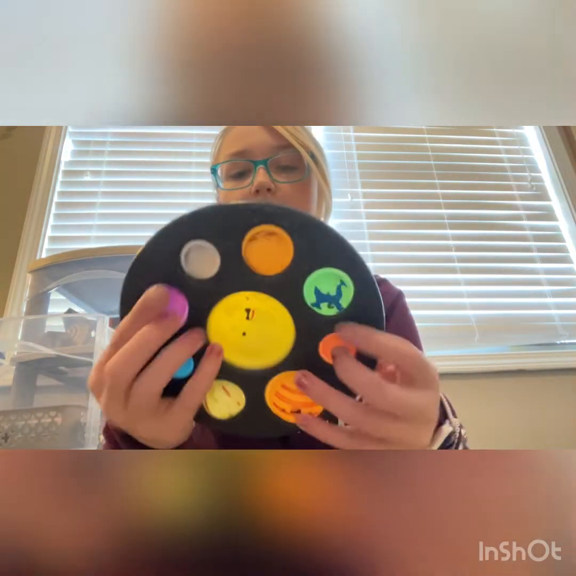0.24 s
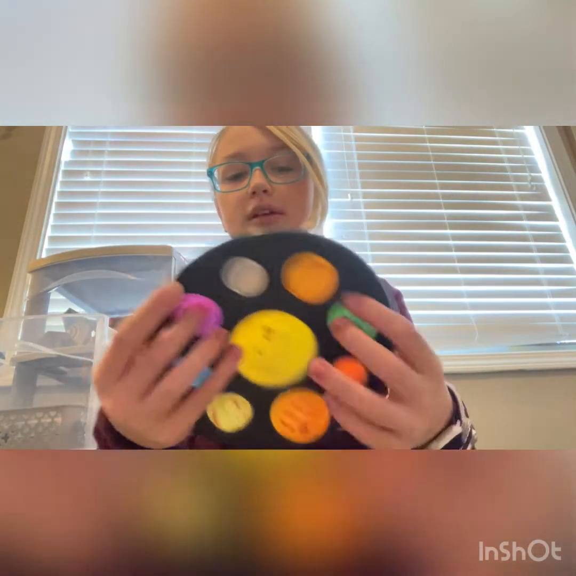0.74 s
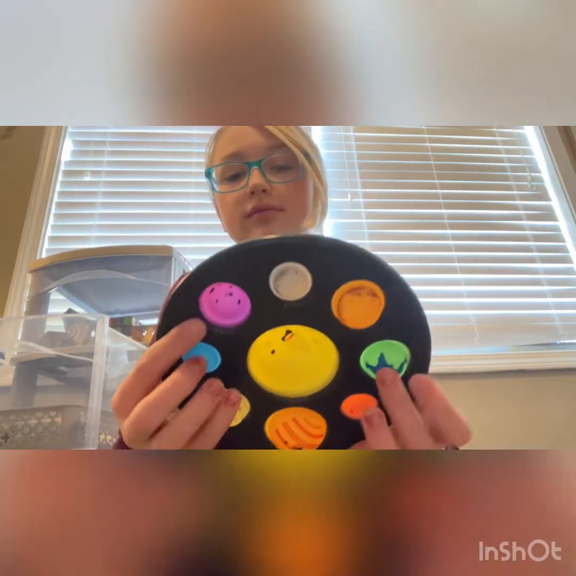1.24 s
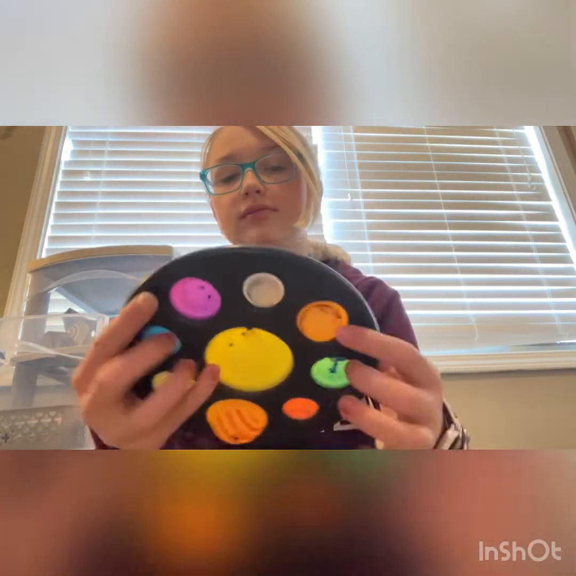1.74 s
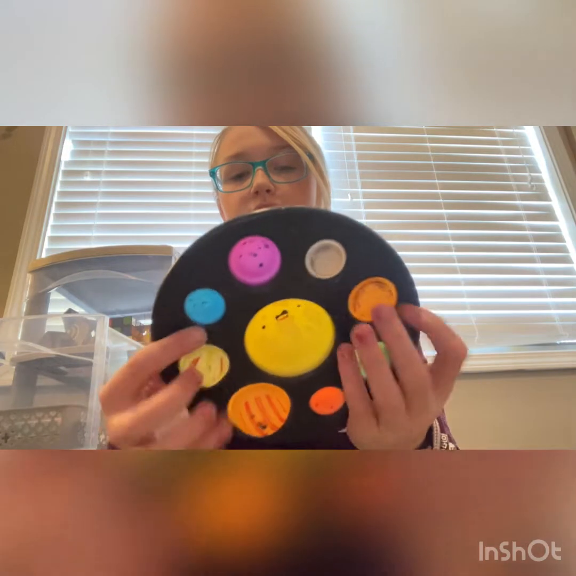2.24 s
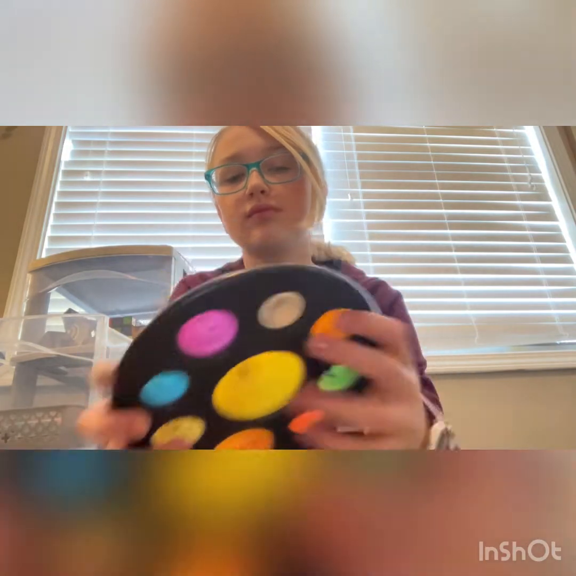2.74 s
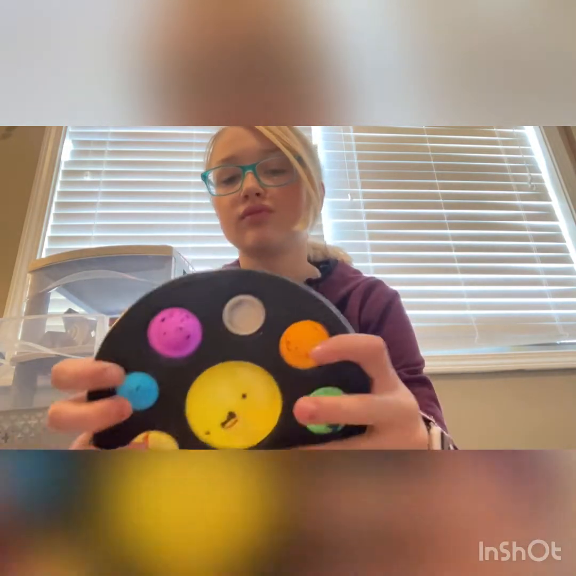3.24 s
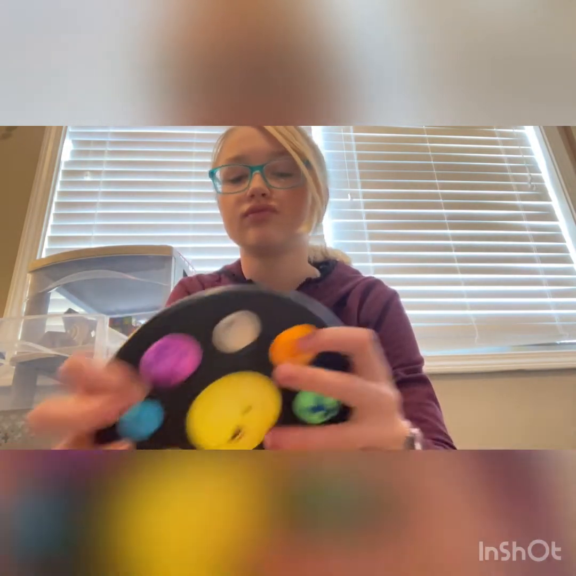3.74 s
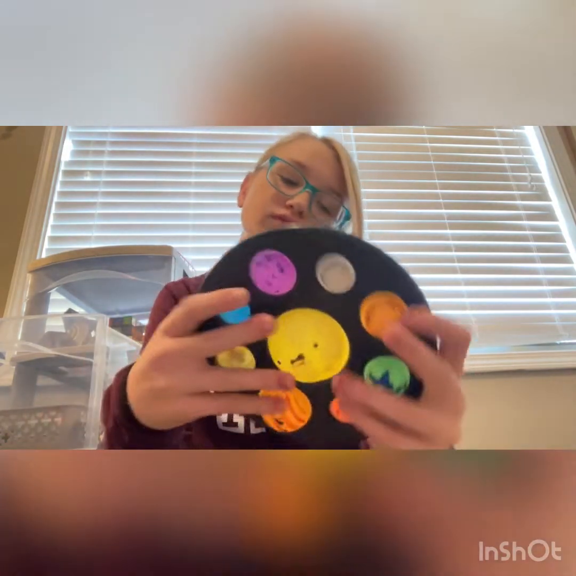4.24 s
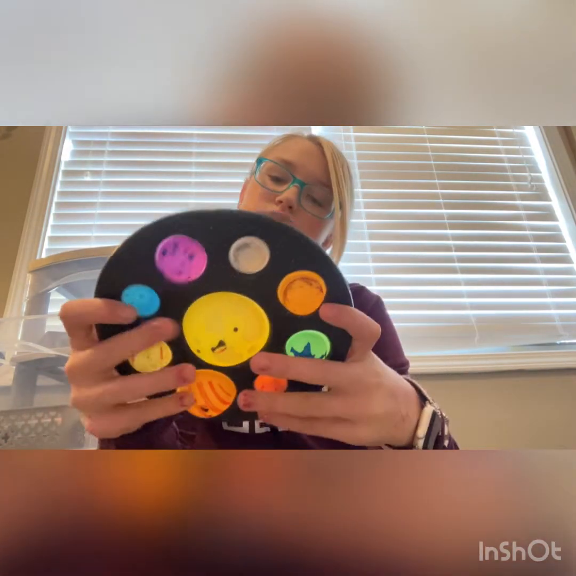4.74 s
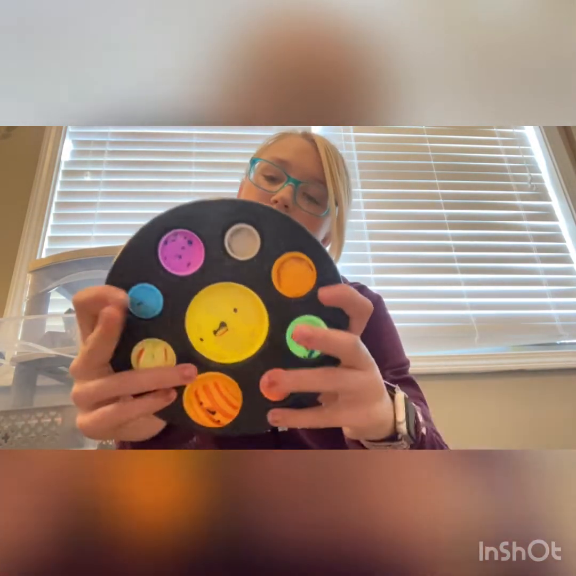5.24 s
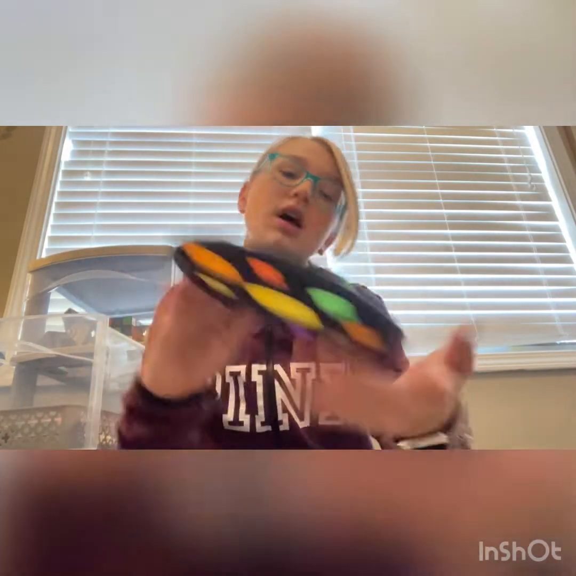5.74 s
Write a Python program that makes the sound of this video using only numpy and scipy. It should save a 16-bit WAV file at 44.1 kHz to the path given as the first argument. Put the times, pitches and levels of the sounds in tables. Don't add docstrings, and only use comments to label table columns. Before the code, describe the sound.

A handheld pop toy is pressed very close to the microphone. Each dimple snaps over with a rough, woody-rubbery click and a bright crack, jolting the plate with a short thud. Early pops are spaced apart among small taps and half-dents; later ones crowd together with louder rubbing. The room adds a brief, faint tail above a quiet hum.

```python
import sys
import numpy as np
from scipy import signal
from scipy.fft import rfft, irfft
from scipy.io import wavfile
from scipy.ndimage import uniform_filter1d

SR = 44100
rng = np.random.default_rng(int(sys.argv[2]) if len(sys.argv) > 2 else 0)


def how_loud(loudness_db):
    steps = np.asarray(loudness_db, float) / 20
    return 10 ** steps


def output_pcm(signal):
    pcm = np.clip(np.atleast_2d(signal).T, -1, 1) * 32767
    wavfile.write(sys.argv[1], SR, np.round(pcm).astype(np.int16))


N = 263318

# f/Hz, correlation
ROOM_LIKENESS = [(130, 0.95), (300, 0.22), (650, 0.47), (1400, 0.11), (3000, 0.11), (5000, 0.097),
                 (6200, 0.28), (15000, 0.1)]


def evened(x):
    return x / np.sqrt(np.mean(x ** 2) + 1e-20)


def peaked(x):
    return x / np.sqrt(2 * uniform_filter1d(x ** 2, size=66).max() + 1e-20)


def wavering(shape, size):
    return evened(uniform_filter1d(rng.standard_normal(shape), size=size))


def read(points, hz):
    f, value = np.transpose(points)
    return np.interp(np.log(hz + 1), np.log(f + 1), value)


def add(mix, start_s, sound):
    part = mix[round(start_s * SR):][:len(sound)]
    part += sound[:len(part)]


def high(x, hz, order):
    return signal.lfilter(*signal.butter(order, hz, "high", fs=SR), x)


def ring(x, modes, detune=1):
    t = np.arange(600) / SR
    body = 0
    for hz, width_hz, db in modes:
        body = body + how_loud(db) * np.exp(-np.pi * width_hz * t) * np.sin(2 * np.pi * hz * detune * t)
    return np.convolve(x, body)[:len(x)]


def noise(colour_db, size, count=N):
    hop = size // 4
    frames, hz = count // hop + 5, np.fft.rfftfreq(size, 1 / SR)[:, None]
    a, b, c, d = rng.standard_normal((frames, len(hz), 4)).T
    alike = np.clip(read(ROOM_LIKENESS, hz), -1, 1)
    left, other = a + 1j * b, c + 1j * d
    z = np.array([left, alike * left + np.sqrt(1 - alike ** 2) * other])
    z = z * how_loud(colour_db(hz, np.arange(frames) * hop / SR))
    return evened(signal.istft(z, nperseg=size, noverlap=size - hop)[1][:, :count])


def air():
    # f/Hz, density/dB
    air_colour = [(30, -3), (86, -7), (184, -16), (600, -32.5), (866, -26.5), (960, -44.5), (5590, -48),
                  (9220, -44)]
    # f/Hz, level/dB rms
    hum_partials = [
        (120, -71),
        (55, -78.5),
        (160, -86.5),
        (267, -86.5),
    ]
    t = np.arange(N) / SR
    hum = np.zeros(N)
    for waver, (hz, db) in zip(2.2 * wavering((len(hum_partials), N), 1500), hum_partials):
        hum += how_loud(waver + db) * np.sqrt(2) * np.sin(2 * np.pi * hz * t)
    level_db = -69.5 + 5.3 * wavering(N, 4000)
    return how_loud(level_db) * noise(lambda hz, s: read(air_colour, hz), size=2048) + hum


def strokes():
    # start t/s, length/s, level/dB, fizz over it/dB
    slides = [(-.06, 0.32, -63, -24), (0.513, 0.38, -63, -11), (0.775, 0.2, -67.5, 2.5),
              (0.893, 0.18, -66, -32), (1.233, 0.14, -51.5, -10), (1.458, 0.37, -61.5, -5.5),
              (1.949, 0.15, -72.5, -9), (2.153, 0.12, -72.5, -6.5), (2.43, 0.4, -62, -6.5),
              (2.79, 0.41, -57, -14), (3.128, 0.29, -53.5, -17), (3.466, 0.18, -46.5, -13),
              (3.735, 0.32, -53, -13), (4.159, 0.33, -54, -15), (4.532, 0.25, -77.5, -12),
              (4.888, 0.079, -78, -25), (5.05, 0.21, -49.5, -28.5), (5.09, 0.025, -61.5, -22.5),
              (5.442, 0.36, -56.5, -14), (5.638, 0.33, -53, -16)]
    rise_s, fall_s, resting_db = 0.057, 0.19, -84
    t, out = np.arange(N) / SR, np.full((2, N), how_loud(resting_db))
    for start_s, length_s, db, fizz_db in slides:
        rise, fall = (t - start_s) / rise_s, (start_s + length_s - t) / fall_s + .5
        shape = np.clip(np.minimum(rise, fall), 0, 1) ** 2
        out += shape * how_loud(np.array([[db], [db + fizz_db]]))
    return out


def rub():
    # f/Hz, level/dB
    rub_colour = [(120, -20.5), (300, -6.5), (620, -15.5), (1400, -4.5), (2000, -10.5), (2700, -11.5),
                  (5000, -19.5), (6200, -39)]
    clump_db, catches_per_s = 4.5, 130
    body_gain, fizz_gain = how_loud(-3.5) * strokes()
    clumps_db = clump_db * wavering((2, N), 350)
    catches = how_loud(1.0 * rng.exponential(1, N)) * (rng.random(N) < catches_per_s / SR)
    grip = how_loud(clumps_db[0]) * (1 + .9 * np.convolve(catches, np.hanning(130), "same"))
    plate_gain = how_loud(read(rub_colour, np.fft.rfftfreq(N, 1 / SR)))
    body = irfft(rfft(rng.standard_normal(N) * grip) * plate_gain, N)
    fizz = signal.lfilter([1], [1, -.4], high(rng.standard_normal(N), 5600, order=4))
    fizz = fizz * np.sqrt(grip) * how_loud(.7 * clumps_db[1])
    return body_gain * evened(body) + fizz_gain * evened(fizz)


def pop(db, cup_hz, rim_db, crack_db, flip_ms, grit_db, knock_db, chance):
    # f/Hz, width/Hz, level/dB
    cup_modes = [
        (1180, 110, -30),
        (1500, 270, -13.5),
    ]
    # f/Hz, width/Hz, level/dB
    rim_modes = [
        (2620, 540, 17.5),
        (3470, 63, -0.5),
        (4040, 150, -1.5),
        (4990, 37, -11),
    ]
    # f/Hz, width/Hz, level/dB
    knock_modes = [
        (378, 6.2, -8),
        (231, 67, -1.5),
    ]
    cup_width_hz = 300
    first_give = 3.8
    far_cup_db, far_rim_db, far_widening = -3, -0.5, 5.5

    t_ms = np.arange(chance.shape[1]) / SR * 1000 - 8
    flip_ms = np.clip(flip_ms, .8, 9.6)
    since, after = np.maximum(t_ms, 0), np.maximum(t_ms - flip_ms, 0)
    push = np.exp(np.minimum(t_ms - .5, 0) / .8 - after / .5 - .5 * since / flip_ms)
    creak = how_loud(-19) * np.exp(np.minimum(t_ms, 0) / 2.6) * (t_ms < flip_ms)
    settle = how_loud(-17) * np.exp(-after / 5) * (t_ms > 0)
    slips = (push + creak + settle) * chance[0] * (0.039 + (abs(chance[1]) > 1.5))
    slips[370] += first_give * how_loud(grit_db)
    soft = np.convolve(slips, np.hanning(9), "same")
    gritty = slips + 0.6 * push * chance[1]
    fizz = (push * np.exp(-since / 4.2) + 1.2 * settle) * chance[2] * (0.21 + abs(chance[0]))

    def cup(v, widening):
        modes = [(cup_hz, cup_width_hz * widening, 0)]
        modes += [(hz, width_hz * widening, mode_db) for hz, width_hz, mode_db in cup_modes]
        return high(ring(v, modes), 0.8 * cup_hz / widening ** .15, order=3)

    def rim(v, widening):
        return high(ring(v, rim_modes, 1 + 0.08 * chance[2, 0]), 2100, order=2)

    def crack(v, widening):
        return signal.lfilter([1], [1, -.68], high(v, 4800, order=4))

    def knock(v, widening):
        return ring(v, knock_modes, 1 + 0.11 * chance[2, 1])

    blow = 1. * (np.arange(len(t_ms)) == 400)
    near, far = np.zeros((2, len(t_ms)))
    for part_db, near_db, far_db, drive, body in [
            (0, grit_db, far_cup_db, soft, cup),
            (rim_db, grit_db, far_rim_db, gritty, rim),
            (crack_db, 0, 0, fizz, crack),
            (-17.5 + knock_db, 0, 0, slips, knock)]:
        part = how_loud(db + part_db) * peaked(body(drive, 1.0))
        near += how_loud(near_db) * part
        far += how_loud(far_db) * evened(body(blow, far_widening)) * np.std(part)
    return near, far


def dimples():
    # t/s, cup level/dB, cup f/Hz
    touches = [(.0246, -48, 1280), (.0546, -46, 1690), (.2383, -38.5, 1580), (.5506, -46, 1310),
               (.584, -38, 1270), (.661, -45, 1300), (.741, -36.5, 1330), (.77, -35, 1310),
               (1.0307, -44, 1384), (1.6572, -39, 1500), (1.677, -47, 1400), (2.307, -44, 1040),
               (2.457, -41, 700), (2.5071, -35.5, 930), (2.5618, -50, 1140), (3.9255, -39, 1350),
               (4.2284, -42.5, 1400), (4.2319, -34.5, 1400), (4.2847, -37.5, 1040), (4.2954, -42, 1090),
               (4.3208, -32.5, 1500), (4.5529, -47, 1430), (4.7085, -44, 1440), (4.9378, -56, 1430),
               (5.5483, -51, 1120), (5.5675, -38, 1860), (5.5731, -35.5, 1340), (5.5798, -36.5, 1810),
               (5.6283, -54, 1490), (5.9105, -42.5, 1060)]
    # t/s, cup level/dB, cup f/Hz, crack over cup/dB
    dents = [(0.0862, -34, 1060, -57), (0.1206, -34, 1120, -21.5), (0.1293, -25.5, 1180, -14),
             (0.591, -32, 1280, -14.5), (0.6952, -32.5, 1290, -20), (0.703, -26.5, 1260, -10.5),
             (0.985, -31, 1270, -18.5), (1.1946, -29, 1074, -17), (0.6005, -51, 1500, 0),
             (1.648, -35.5, 1580, -14), (1.7091, -30.5, 1460, -14), (1.742, -23, 1410, -21.5),
             (1.741, -22.5, 2530, -56), (0.9073, -42, 1500, 0.5), (1.7768, -32, 1410, -7),
             (1.8511, -31, 1380, -59), (1.86, -32.5, 1250, -37.5), (1.8885, -27.5, 1380, -25.5),
             (2.271, -37.5, 1085, -70), (0.8971, -38, 1740, -10), (2.525, -34, 1720, -7),
             (2.642, -34.5, 1628, -23), (3.3172, -33, 1180, -12.5), (3.4998, -30, 1010, -15.5),
             (3.848, -32, 1620, -10), (4.4335, -30, 1045, -22.5), (5.4929, -45.5, 2700, -13),
             (5.616, -36.5, 1200, -12.5), (5.6575, -28, 1240, -26), (5.6716, -31.5, 1610, -11)]
    # t/s, level/dB
    creaks = [(0.228, -58), (0.644, -60), (0.9168, -46), (0.9596, -44.5), (1.048, -53.5), (1.269, -62.5),
              (1.2827, -52), (1.9988, -57.5), (2.0539, -62), (2.174, -62), (2.1936, -63), (2.206, -63.5),
              (2.9989, -41), (3.413, -62.5), (3.434, -56), (3.462, -52), (4.158, -49), (4.588, -64),
              (4.599, -48), (4.7187, -51), (5.4958, -45.5)]
    # t/s, cup level/dB, cup f/Hz
    peels = [(.3044, -35.5, 1480), (.7196, -29.5, 1090), (.7858, -33.5, 1330), (.8196, -45, 1074),
             (.9335, -43, 1590), (1.7598, -35, 1500), (.9394, -36, 1420), (1.0563, -41, 1440),
             (1.2074, -40.5, 1000), (1.2909, -41, 1110), (1.5065, -41, 1850), (1.5469, -45.5, 1300),
             (1.5945, -48, 1176), (1.7176, -36, 1400), (2.0306, -55.5, 1453), (2.4801, -43.5, 1278),
             (2.8083, -46, 1850), (3.0162, -41.5, 1180), (3.2057, -38.5, 2010), (3.289, -36.5, 1460),
             (3.3604, -39.5, 1830), (3.5119, -54, 1380), (3.7946, -60, 1460), (3.8354, -56, 4000),
             (3.9425, -42.5, 1270), (4.1957, -47, 1383), (5.0589, -45.5, 1594), (5.4626, -44, 1273),
             (5.609, -44, 1140), (5.5287, -46.5, 4640)]
    # t/s, cup level/dB, cup f/Hz, crack over cup/dB, flip length/ms
    flips = [(0.3561, -13.5, 1440, -25.5, 6.9), (.413, -19.5, 845, -50.5, 9.8),
             (0.434, -7.5, 780, -18.5, 3.7), (1.3203, -7.5, 1395, -29, 3.7),
             (1.3299, -13, 1206, -17.5, 2.8), (1.3489, -19.5, 1300, -13.5, 3.3),
             (2.3332, -11, 1107, -40.5, 4.8), (2.3455, -9.5, 1306, -15, 0.79), (2.349, -4, 921, -14, 3.3),
             (2.3564, -19.5, 981, -26.5, 3.0), (2.8711, -3, 1198, -14, 2.7), (2.9042, -2.5, 1290, -13, 6.8),
             (3.1003, -14, 1930, -18, 4.1), (3.1275, -7.5, 1353, -8.5, 4.2), (3.558, -3.5, 1047, -13, 1.7),
             (3.562, -8.5, 1400, -25.5, 3.6), (3.573, -24.5, 1567, -34.5, 1.6),
             (3.873, -17.5, 1677, -6, 3.3), (3.9618, -10, 1310, -9.5, 4.6), (4.3342, -14, 770, -17, 17),
             (4.3453, -6, 1500, -15, 7.2), (5.1207, -4, 1680, -11.5, 6.6), (5.7448, -17.5, 1500, -4, 4.6),
             (5.7539, -14.5, 1600, -17.5, 7.3)]
    touch_ms, tick_ms, dent_ms, creak_hz = 4.8, 2.6, 3.2, 1400
    grit_db, grit_knock_db = -10.5, -1
    presses = [(*row, grit_db, grit_knock_db) for row in flips] + [(*row, dent_ms, 0, 0) for row in dents]
    rows = []
    for s, db, hz, crack_db, *more in presses:
        rim_db = 1.5 + 0.68 * crack_db
        rows.append((s, db, hz, rim_db, crack_db, *more))
    creaking = [(*row, creak_hz) for row in creaks]
    for ticks, rim_db, ms in [(touches, -18, touch_ms), (peels, -8.5, tick_ms), (creaking, -2.5, tick_ms)]:
        rows += [(s, db, hz, rim_db, rim_db - 12, ms, 0, 0) for s, db, hz in ticks]
    out = np.zeros((2, N))
    for (s, *settings), chance in zip(rows, rng.standard_normal((len(rows), 3, 1700))):
        for mix, sound in zip(out, pop(*settings, chance)):
            add(mix, s - .0086, sound)
    return out


def plate():
    # t/s, level/dB, f/Hz, t60/s
    swings = [(.13, -51.5, 457, 0.018), (1.194, -52, 381, 0.016), (.59, -49, 285, 0.026),
              (.241, -56.5, 377, 0.041), (2.334, -22, 343, 0.012), (5.121, -29, 381, 0.05),
              (.361, -37.5, 161.4, 0.2), (.424, -40.5, 111, 0.091), (.594, -42, 100, 0.033),
              (.724, -33.5, 115, 0.018), (.91, -45, 102, 0.045), (.945, -28.5, 67.1, 0.028),
              (1.328, -33, 103, 0.049), (1.72, -25, 74, 0.023), (2.002, -37, 71.6, 0.033),
              (2.043, -45.5, 73.4, 0.05), (2.49, -50.5, 69, 0.06), (2.645, -49.5, 120, 0.049),
              (2.351, -18.5, 104, 0.023), (2.589, -40, 80.3, 0.064), (2.877, -33.5, 163.5, 0.12),
              (3.131, -29, 127, 0.032), (3.503, -35, 92.7, 0.038), (3.56, -27.5, 108.4, 0.046),
              (3.5605, -30.5, 335.4, 0.027), (3.88, -27, 80.7, 0.027), (3.963, -23, 142, 0.027),
              (4.232, -39, 127.2, 0.022), (4.342, -33, 111, 0.071), (4.558, -54, 68.4, 0.09),
              (.092, -43, 60, 0.038), (.366, -35, 70, 0.049), (.742, -45, 60, 0.04),
              (1.345, -24.5, 65, 0.024), (1.873, -42.5, 59.3, 0.033), (4.36, -34, 52, 0.072),
              (5.125, -19, 78, 0.027), (5.755, -22.5, 74, 0.023)]
    # t/s, level/dB, f/Hz
    flexes = [(.414, -35.5, 310), (.434, -15.5, 367), (1.329, -28, 190), (1.354, -24, 207),
              (1.675, -42.5, 252), (2.345, -16.5, 226), (2.352, -18, 414), (2.906, -12.5, 162),
              (2.904, -14.5, 219), (3.101, -22, 364), (3.129, -12, 277), (3.318, -41.5, 247),
              (3.501, -26.5, 325), (3.558, -8.5, 338), (3.849, -33.5, 290), (3.962, -14.5, 266),
              (4.336, -22, 253), (4.346, -14, 312), (5.619, -46.5, 326), (5.747, -28.5, 220)]
    flex_cycles = 3.43
    out, t = np.zeros(N), np.arange(9000) / SR
    for s, db, hz, t60_s in [*swings, *[(s, db, hz, flex_cycles / hz) for s, db, hz in flexes]]:
        turns = hz * (t + 0.0008 * (1 - np.exp(-t / 0.0056)))
        swell = 1 - np.exp(-(t * hz / 0.5) ** 2)
        decay = how_loud(db + 3.0 - 60 * t / max(t60_s, .01))
        add(out, s - 0.099 / hz, decay * swell * np.sin(2 * np.pi * turns))
    return out


def gives():
    # t/s, level/dB, f/Hz, swell/ms
    flip_gives = [(0.3571, -19, 1450, 0.92), (0.3624, -32, 1400, 1.3), (0.4138, -17.5, 684, 0.22),
                  (0.4393, -19.5, 1025, 0.56), (1.3212, -16.5, 1440, 0.85), (1.3289, -14, 1370, 0.32),
                  (1.3332, -16, 1330, 0.27), (1.3344, -38.5, 1560, 1), (1.3493, -23.5, 1260, 0.95),
                  (1.3536, -24, 1670, 0.51), (1.3592, -28.5, 1590, 0.95), (2.3345, -15.5, 984, 0.72),
                  (2.3449, -8.5, 1430, 0.67), (2.3502, -9.5, 720, 0.69), (2.3575, -8.5, 680, 0.47),
                  (2.365, -16.5, 1140, 0.6), (2.8714, -14, 895, 1), (2.8719, -10.5, 1470, 0.94),
                  (2.9035, -5, 1240, 0.67), (3.1026, -24.5, 1700, 1.1), (3.1278, -5, 1340, 0.53),
                  (3.5574, -4, 1404, 0.25), (3.5577, -7, 1040, 0.57), (3.5606, -16, 1615, 2.01),
                  (3.5631, -26, 1540, 0.83), (3.5737, -27, 1725, 1.3), (3.8734, -23, 1880, 0.34),
                  (3.8767, -18.5, 1540, 0.24), (3.9607, -15, 1218, 1.4), (3.9674, -25, 1880, 0.86),
                  (4.3374, -19, 1460, 0.3), (4.3392, -29.5, 1120, 0.64), (4.3443, -11.5, 1687, 1.1),
                  (4.3453, -18.5, 744, 0.7), (4.3487, -18, 1437, 1.9), (4.3524, -14, 1139, 0.62),
                  (4.3547, -24, 1930, 0.9), (5.1201, -11.5, 1830, 1.06), (5.1227, -4.5, 1410, 1.1),
                  (5.7457, -18, 1443, 0.52), (5.7483, -21.5, 1470, 0.78), (5.7528, -17, 1430, 0.25),
                  (5.7575, -32, 1160, 1.5),
                  (0.3567, -37.5, 2940, 0.67), (0.4328, -20, 5180, 0.27), (0.4334, -19, 3670, 0.35),
                 (0.4342, -22.5, 2620, 0.6), (0.4385, -26.5, 4360, 0.68), (0.4398, -22, 2580, 0.5),
                 (1.3295, -20.5, 4650, 0.37), (1.3296, -14.5, 2930, 0.79), (2.3437, -25, 3780, 1.06),
                 (2.3448, -14.5, 2574, 0.52), (2.3491, -17.5, 5120, 0.58), (2.3495, -12.5, 3790, 0.34),
                 (2.35, -17.5, 2460, 1.1), (2.3613, -30.5, 2600, 1.8), (2.3658, -27.5, 2490, 0.89),
                 (2.8717, -11, 4070, 0.58), (2.8724, -13, 2500, 0.82), (2.9028, -15.5, 4440, 0.41),
                 (2.9032, -15.9, 2800, 0.83), (2.9033, -25, 3620, 1.9), (2.9057, -28.5, 4090, 1),
                 (2.906, -17, 2087, 0.74), (3.1009, -27, 2750, 0.99), (3.1278, -26.5, 3390, 1.1),
                 (3.1288, -24.5, 4350, 0.75), (3.1297, -9.5, 1980, 0.39), (3.1311, -17, 2630, 0.94),
                 (3.5573, -20, 5420, 1.01), (3.5578, -20, 2880, 0.79), (3.5579, -9.5, 4100, 0.49),
                 (3.5594, -20, 2800, 0.93), (3.5631, -23.5, 3875.0, 0.56), (3.8728, -35.5, 5100, 0.95),
                 (3.9608, -28, 4443, 1.4), (3.9618, -22.5, 5900, 0.46), (3.962, -33, 3474, 0.94),
                 (3.9624, -19.5, 2395, 0.82), (3.9635, -24.5, 4050, 0.5), (4.3466, -12.5, 2645, 0.54),
                 (4.3494, -23.5, 3030, 0.83), (5.1203, -14.5, 3610, 0.49), (5.1229, -14.5, 4140, 1.26),
                 (5.1247, -9, 2594, 0.76), (5.7449, -19.5, 2720, 0.63), (5.7449, -26.5, 4840, 0.87),
                 (5.7592, -26, 2680, 1.1),
                  (3.55, -31.5, 1300, 1.8), (.416, -26.5, 1500, 0.85), (0.4339, -8.5, 757, 0.62),
             (0.4358, -10.5, 904, 0.27), (2.333, -20.5, 1500, 0.66), (2.358, -17.5, 1300, 0.88),
             (2.878, -24, 1500, 0.91), (2.897, -22, 1590, 2.2), (2.902, -25, 987, 0.77),
             (2.905, -12, 1217, 0.74), (3.131, -20.5, 1100, 0.91), (3.5785, -25.5, 1110, 0.86),
             (4.372, -31.5, 1336, 0.82), (5.116, -26.5, 1500, 1.16), (5.1207, -11, 2298, 1.2),
             (5.126, -4, 1550, 0.81), (5.1268, -20.5, 3700, 1.0), (5.129, -17, 2800, 0.72)]
    out, t = np.zeros(N), np.arange(900) / SR
    for s, db, hz, swell_ms in flip_gives:
        u = t / (np.clip(swell_ms, .2, 3) / 1000)
        tone = np.sin(2 * np.pi * hz * t * (1.01 - 0.0043 * u))
        add(out, s, how_loud(db + 2.0) * u * np.exp(1 - u) * tone)
    return out


def echoes(x):
    # delay t/s, level/dB
    walls = [
        (0.015, -20),
        (0.022, -24.5),
        (.029, -30),
    ]
    out = np.zeros(N)
    for s, db in walls:
        add(out, s, how_loud(db) * x)
    return out


def room(x):
    # f/Hz, t60/s
    room_t60 = [(100, 0.57), (300, 0.028), (700, 0.25), (1500, 0.3), (3000, 0.26), (6000, 0.21),
                (14000, 0.24)]
    # f/Hz, level/dB
    room_colour = [(100, -1), (400, 2.5), (1500, 1), (4000, -0.5), (8000, 6), (15000, 4)]
    out, turn = np.zeros((2, N)), np.arange(N) / SR * 1.5
    t = np.arange(SR // 2) / SR

    def dying_db(hz, s):
        return read(room_colour, hz) - 60 * np.minimum(s, 1) / read(room_t60, hz)

    for k in range(3):
        tail = noise(dying_db, size=256, count=len(t))[:, :len(t)]
        lumps = how_loud(3.0 * wavering(len(t), 90))
        tail = tail * np.clip((t - .006) / 0.0005, 0, 1) * lumps
        share = np.sqrt(2 / 3) * abs(np.cos(np.pi * (turn + k / 3)))
        out += signal.fftconvolve((x * share)[None], tail / np.linalg.norm(tail[0]), axes=1)[:, :N]
    return out


def ports(pair, wander):
    # f/Hz, phase/rad
    port_lead = [(0, 0), (1700, -.1), (2600, -1.6), (3300, -1.5), (4000, -.6), (4700, -1.2), (5750, -3.14),
                 (16950, 9.42)]
    # f/Hz, level/dB
    port_balance = [(60, 0), (300, -.7), (800, -1), (1400, -2), (2400, -2.5), (4400, -2.5), (6500, 0),
                    (15000, 0)]
    # f/Hz, phase/rad
    tilt_wander = [(60, .22), (300, .28), (1400, .4), (2300, .8), (4000, .85), (5000, 1.6), (6200, .25),
                   (15000, .2)]
    hz, _, z = signal.stft(pair, SR, nperseg=256, noverlap=192)
    tilt = uniform_filter1d(rng.standard_normal(z[0].shape), size=6, axis=0)
    tilt = evened(uniform_filter1d(tilt, size=20))
    lead = np.interp(hz, *np.transpose(port_lead))[:, None] + wander * read(tilt_wander, hz)[:, None] * tilt
    half = how_loud(wander * read(port_balance, hz) / 2)[:, None]
    both = np.array([z[0] * np.exp(1j * lead) * half, z[1] / half])
    return signal.istft(both, SR, nperseg=256, noverlap=192)[1][:, :N]


def dipped(x):
    # f/Hz, half width/Hz, level/dB
    treble_dips = [
        (6300, 350, -3),
        (11400, 650, -9),
    ]
    hz = np.fft.rfftfreq(N, 1 / SR)
    dip_db = sum(db * np.exp(-((hz - f) / half_hz) ** 4) for f, half_hz, db in treble_dips)
    return irfft(rfft(x) * how_loud(dip_db), N)


def scene():
    near, far = how_loud(-3.5) * dimples()
    near = near + how_loud(-3.5) * gives()
    hands = how_loud(8.0) * plate() + rub()
    toy = near + hands + echoes(how_loud(-2.5) * near + how_loud(-4.0) * far + hands)
    around = how_loud(-10.0) * room(far + hands) + air()
    return ports(np.array([toy, toy]), wander=1) + ports(around, wander=0)


def roll_off(x):
    return signal.sosfilt(signal.butter(12, 16500, fs=SR, output="sos"), x)


def record(dry):
    edge_hz, bass_hz, ceiling = 15150, 48, 1.3
    edge = signal.firwin(151, edge_hz, window=("kaiser", 8), fs=SR)
    cut = signal.oaconvolve(high(dipped(dry), bass_hz, order=3), edge[None], "same")
    return roll_off(ceiling * np.tanh(how_loud(2.0) * cut / ceiling))


dry = scene()
out = record(dry)
output_pcm(out)
```